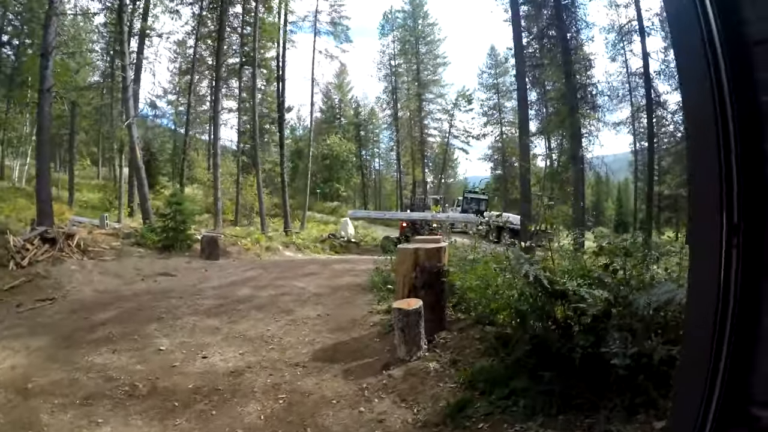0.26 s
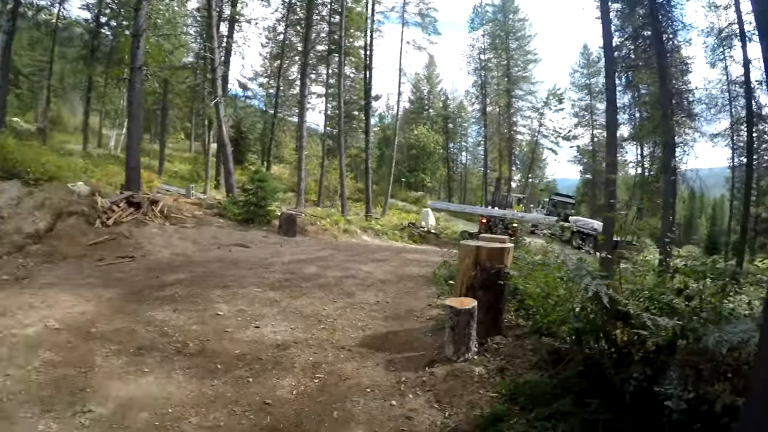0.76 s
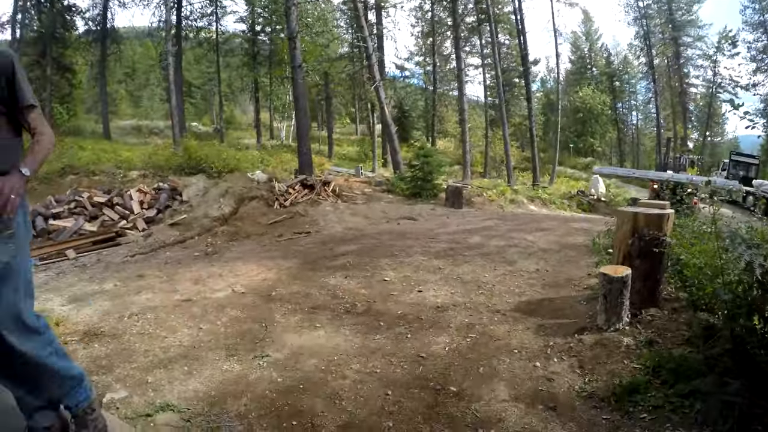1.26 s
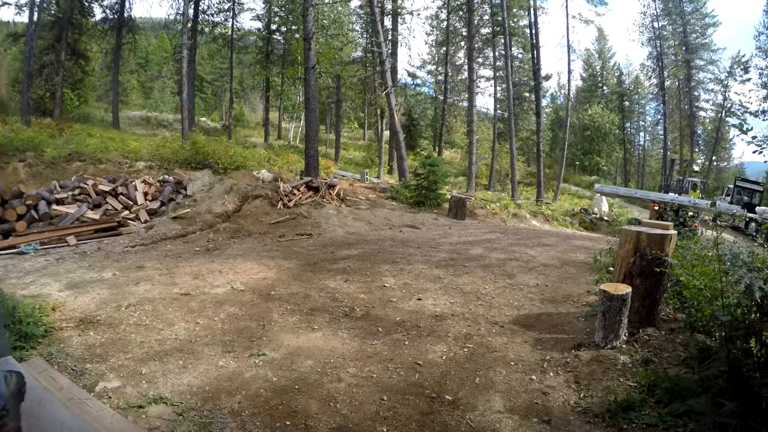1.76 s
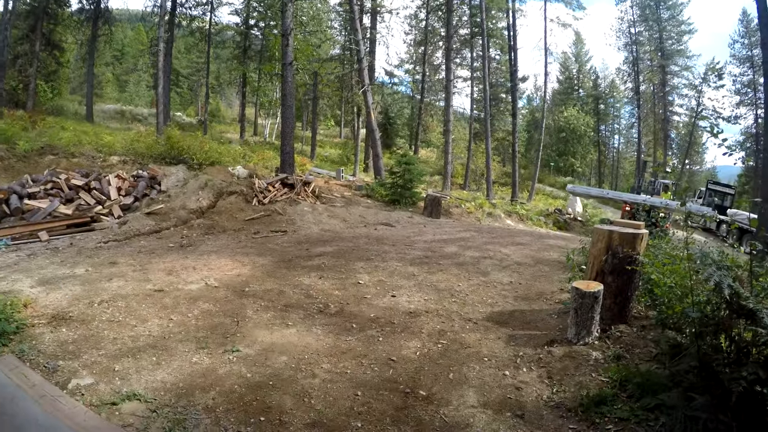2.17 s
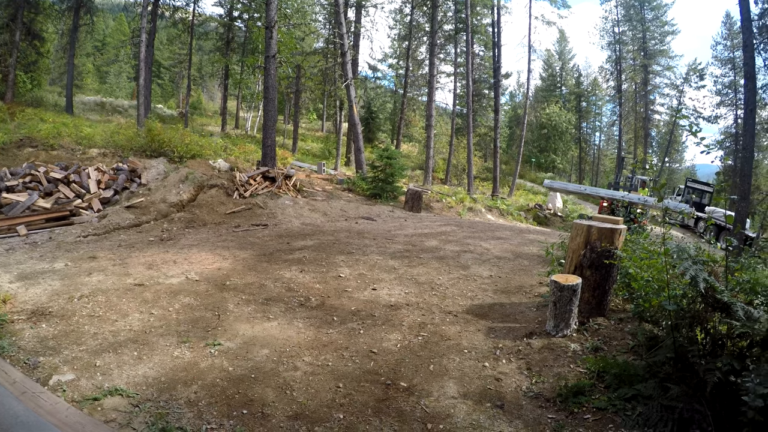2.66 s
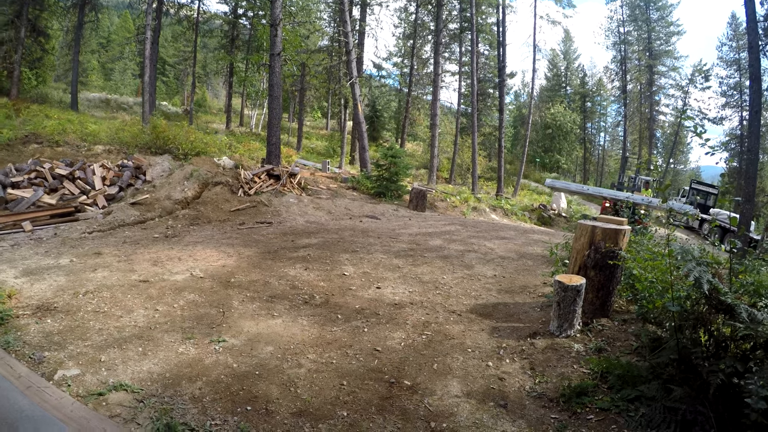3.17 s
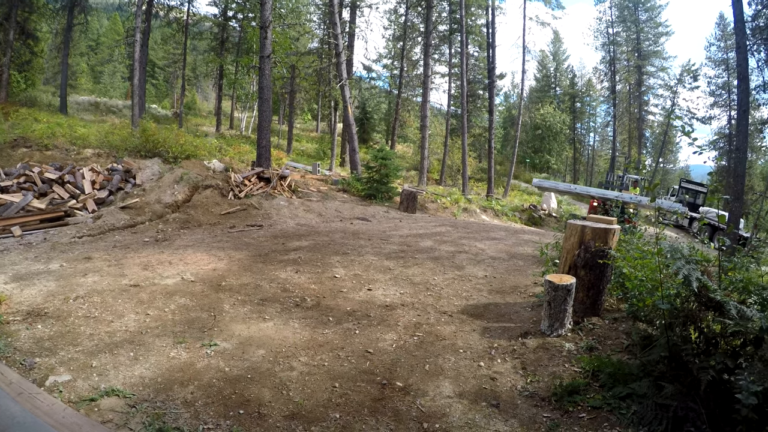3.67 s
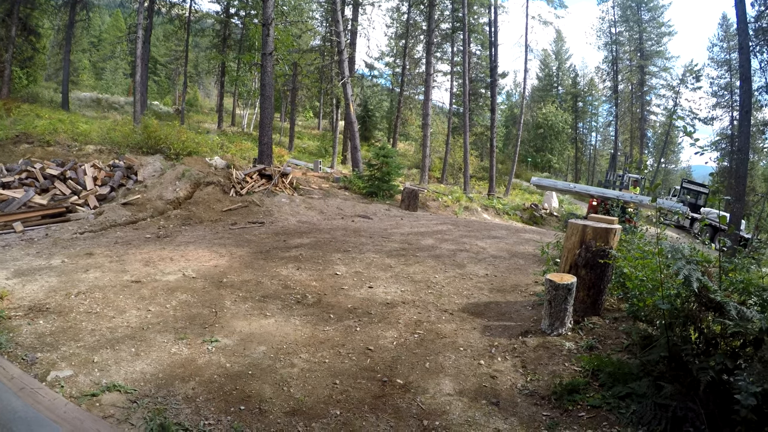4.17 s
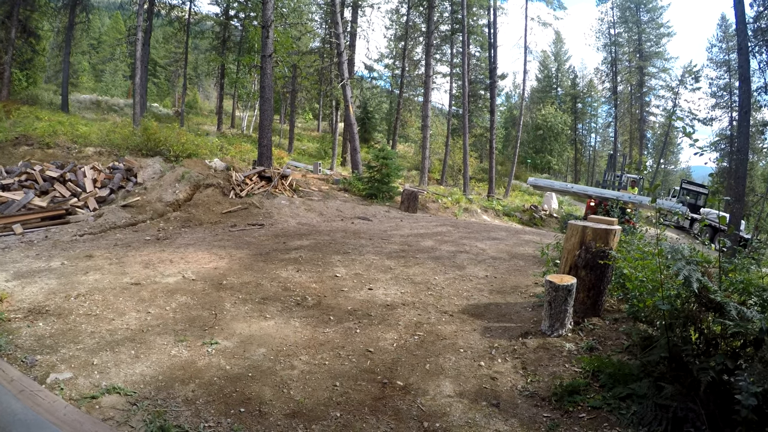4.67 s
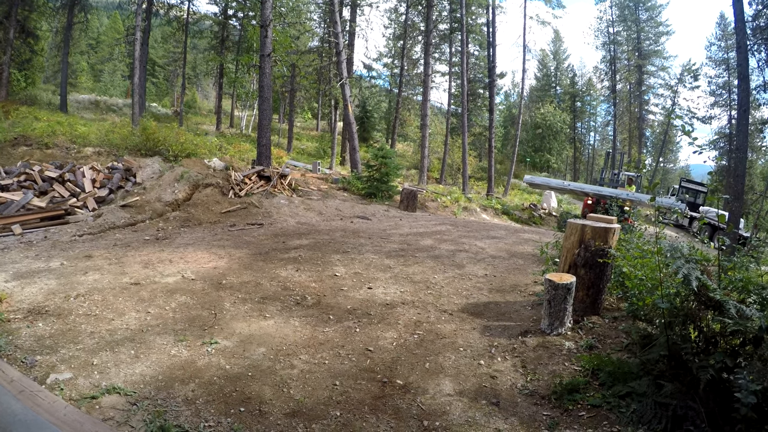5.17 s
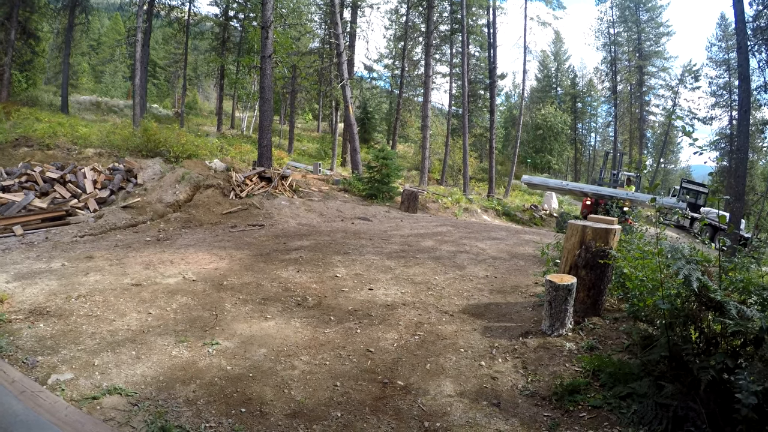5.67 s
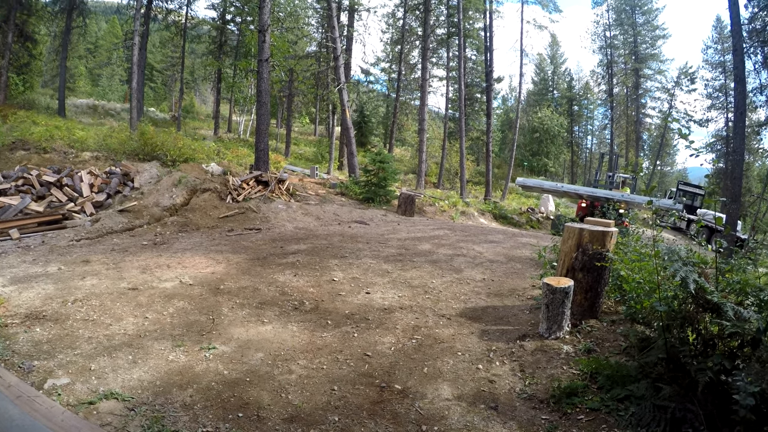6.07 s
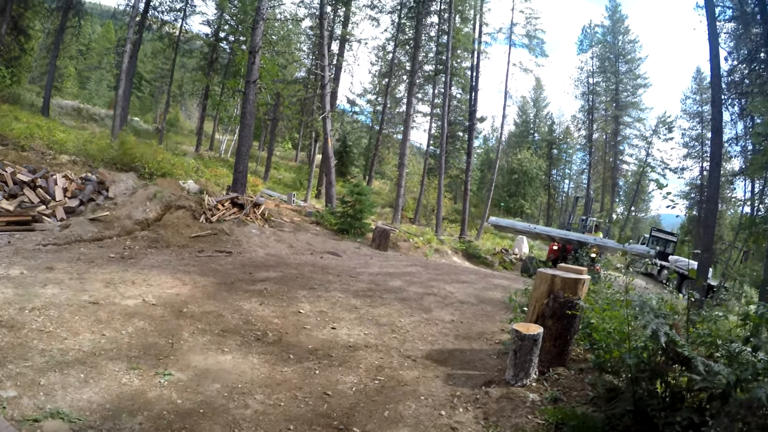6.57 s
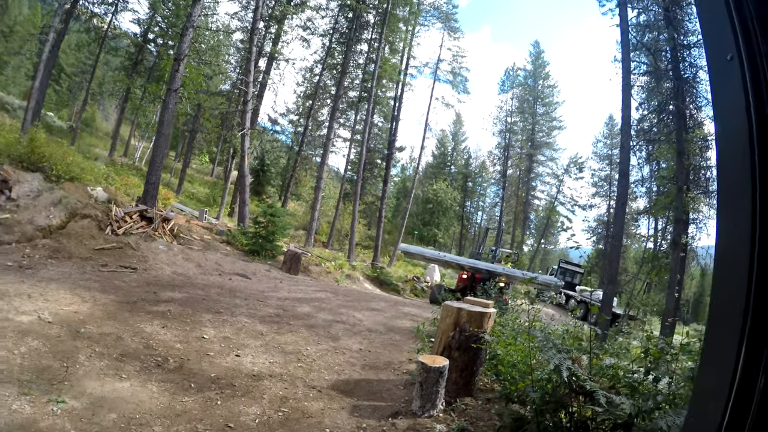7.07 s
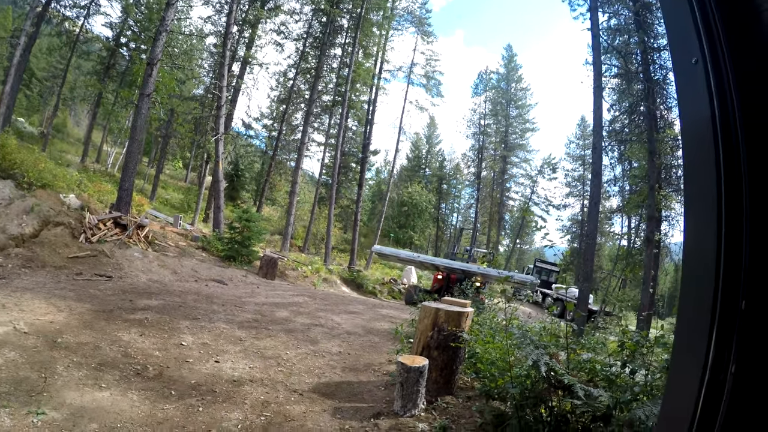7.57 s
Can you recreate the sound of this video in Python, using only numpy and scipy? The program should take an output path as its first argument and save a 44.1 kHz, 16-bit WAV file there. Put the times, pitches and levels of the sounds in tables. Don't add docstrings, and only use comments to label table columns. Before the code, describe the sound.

A small diesel forklift runs steadily some distance away in an open dirt yard, its throaty drone mixed with metallic clatter and fast injector ticking. Hydraulic pump whine swells and eases as levers are worked. A larger truck idles low underneath. A handheld camera picks up close scuffs and a dull knock in the first second, then more rubbing near the end as the engine grows brighter.

```python
import sys
import numpy as np
from scipy import signal
from scipy.fft import rfft, irfft, next_fast_len
from scipy.io import wavfile
from scipy.ndimage import map_coordinates

SR = 44100
rng = np.random.default_rng(int(sys.argv[2]) if len(sys.argv) > 2 else 0)


def inscribe(sig):
    pcm = np.round(np.clip(np.atleast_2d(sig).T, -1, 1) * 32767)
    wavfile.write(sys.argv[1], SR, pcm.astype(np.int16))


def attenuation_scalar(level_db):
    decades = np.asarray(level_db, float) / 20
    return 10 ** decades


N = 344862


def unit(x):
    return x / np.sqrt(np.mean(x ** 2) + 1e-20)


def along(points, hz, axis=1):
    table = np.asarray(points, float)
    return np.interp(np.log(hz + 1), np.log(table[:, 0] + 1), table[:, axis])


def curve(rows):
    s, value = np.transpose(rows)
    return np.interp(np.arange(N) / SR, s, value)


def held(start_s, length_s, ramp_s):
    t = np.arange(N) / SR
    inside_s = np.minimum(t - start_s, start_s + length_s - t)
    return np.clip(inside_s / ramp_s + .5, 0, 1)


def wobble(rate):
    at = np.arange(0, N + 64, 64)
    knots = rng.standard_normal(int(N * rate / SR) + 4)
    smooth = map_coordinates(knots, [at * rate / SR])
    return np.interp(np.arange(N), at, smooth)


def filtered(x, response):
    m = next_fast_len(N + SR // 4)
    return irfft(rfft(x, m) * response(np.fft.rfftfreq(m, 1 / SR)), m)[..., :N]


def coloured(spectrum):
    return unit(filtered(rng.standard_normal(N), lambda hz: attenuation_scalar(along(spectrum, hz))))


def resonance(hz, centre_hz, width_hz):
    return 1j * hz * width_hz / (centre_hz ** 2 - hz ** 2 + 1j * hz * width_hz)


def tone(cycles, db, drift, sway_db):
    turn = cycles + rng.random() + drift * wobble(3)
    return np.sqrt(2) * attenuation_scalar(db + sway_db * wobble(4)) * np.sin(2 * np.pi * turn)


def knocks(cycle, pattern, decay_s, echo_s, echo_db, scatter_db):
    blows = np.zeros(N)
    turns = np.arange(int(cycle[-1]))
    for share, db in pattern:
        at = np.searchsorted(cycle, turns + share)
        blows[at] = attenuation_scalar(db + scatter_db * rng.standard_normal(len(at)))
    t = np.arange(SR // 20) / SR
    shape = t / decay_s * np.exp(1 - t / decay_s)
    shape = shape + attenuation_scalar(echo_db) * np.interp(t - echo_s, t, shape, left=0)
    return signal.fftconvolve(blows, shape)[:N]


def doorway():
    return held(-1, 1 + 1.05, ramp_s=.26)


DOOR_DB = -5

# time in seconds, treble gain in dB.
FACING = [
    (0, 1),
    (.72, 1),
    (.88, -2.5),
    (1.6, -1),
    (4, -0.5),
    (6.3, -0.5),
    (6.5, 5),
    (7.25, 5.5),
    (7.55, 10.5),
    (7.82, 9.5),
]


def facing_db():
    return curve(FACING)


# time in seconds, firings per second.
FIRING_RATE = [(0, 37.12), (.42, 37.46), (1.02, 37.42), (1.2, 37.95), (1.72, 38.02), (1.87, 38.45),
               (2.15, 38.05), (2.35, 38.23), (3.0, 37.7), (3.45, 37.94), (3.85, 37.72), (4.3, 38.16),
               (6.4, 38.0), (6.8, 37.62), (6.95, 38.2), (7.45, 37.86), (7.7, 38.0), (7.82, 38.45)]


def crank():
    return np.cumsum(curve(FIRING_RATE)) / SR / 3


# multiple of the cycle, level in dB rms.
ENGINE_ORDERS = [(3, -28.5), (6, -22.5), (9, -28.5), (19, -40), (22, -35), (30, -41), (31, -36), (33, -39),
                 (37, -36), (39, -38.5), (41, -39.5), (44, -45.5), (45, -43), (48, -40), (54, -37),
                 (57, -55), (66, -61), (69, -60), (72, -43.5), (74, -52.5), (78, -64.5), (80, -59),
                 (90, -56.5), (92, -50), (93, -61.5), (96, -64), (115, -66), (180, -74)]


def engine_orders(cycle):
    out = np.zeros(N)
    for k, db in ENGINE_ORDERS:
        shade_db = DOOR_DB * doorway() * (k > 60)
        drift, sway_db = (.02, 1) if k < 10 else (.06, 1.8)
        out += tone(k * cycle, db + shade_db, drift, sway_db)
    return out


# multiple of the cycle, level in dB rms.
PUMP_TONES = [
    (24, -25.5),
    (36, -31),
    (105, -59),
    (108, -46),
]
# start in seconds, length in seconds, swell in dB.
LEVER_PULLS = [
    [(-.1, .45, 9), (.35, .8, 6), (1.85, .9, 2), (3.0, .6, 3), (3.65, .4, 6.5), (4.7, 1.5, 3),
     (6.6, 0.24, 5), (7.05, 0.26, 4)],
    [(.3, 0.67, 3.5), (1.17, 0.607, 7), (1.77, .75, 11), (4.0, 2.3, 7), (4.7, .6, 3), (6.84, .42, 13),
     (7.68, .3, 13)],
    [(3.0, 4.6, 11), (6.85, .75, 3)],
    [(-.1, .85, 3), (.95, .85, 6.5), (1.35, 0.41, 4), (2.3, .22, 4), (5.1, 1.45, 3.5), (6.85, 0.95, 6),
     (7.25, .44, 7.5)],
]


def pump_whine(cycle):
    out = np.zeros(N)
    for (k, rest_db), pulls in zip(PUMP_TONES, LEVER_PULLS):
        swell_db = sum(db * held(s, length, ramp_s=.05) for s, length, db in pulls)
        out += tone(k * cycle, rest_db + swell_db, drift=.04, sway_db=.82)
    return out


# frequency in Hz, level in dB.
CASING_SPECTRUM = [(400, -69.5), (680, 7), (760, 1.5), (950, -3), (1080, -7), (1180, -4), (1280, -9),
                   (1370, -4), (1500, -15.5), (1850, -16.5), (2000, -24), (2300, -34.5), (2700, -56),
                   (5000, -120)]
# share of the cycle, level in dB.
VALVE_BLOWS = [
    (.18, 3.5),
    (.48, 2),
    (.8, 4.5),
]


def casing_clatter(cycle):
    one_cycle = rng.standard_normal(2048)
    repeated = one_cycle[(cycle % 1 * len(one_cycle)).astype(int)]
    comb = filtered(repeated, lambda hz: attenuation_scalar(along(CASING_SPECTRUM, hz)))
    blows = knocks(cycle, VALVE_BLOWS, decay_s=.0014, echo_s=.0063, echo_db=-1.5, scatter_db=5.5)
    valves = (1.5 + .44 * blows) * coloured(CASING_SPECTRUM)
    casing_db = -35 + .32 * facing_db() + DOOR_DB * doorway()
    return attenuation_scalar(casing_db) * unit(.68 * unit(comb) + unit(valves))


# share of the cycle, level in dB.
INJECTIONS = [
    (.09, -7),
    (.43, -1.5),
    (.76, -3),
]


def injector_knock(cycle):
    def cover(hz):
        return resonance(hz, 3180, 380) * resonance(hz, 3330, 370)

    snap_s = .00004
    jets = .45 + knocks(cycle, INJECTIONS, decay_s=.0013, echo_s=.0078, echo_db=-4.5, scatter_db=2.5)
    spray = filtered(jets * rng.standard_normal(N), cover)
    needle = knocks(cycle, INJECTIONS, snap_s, echo_s=.0066, echo_db=-5, scatter_db=2)
    knock = unit(.39 * unit(filtered(needle, cover)) + unit(spray))
    clean = knocks(cycle, INJECTIONS, snap_s, echo_s=.004, echo_db=-3, scatter_db=2.5)
    ring = unit(filtered(clean, lambda hz: resonance(hz, 3250, 270) ** 2))
    knock = attenuation_scalar(DOOR_DB * doorway()) * knock + (.19 + .7 * doorway()) * ring
    return attenuation_scalar(-58 + facing_db()) * knock


def forklift():
    cycle = crank()
    return engine_orders(cycle) + pump_whine(cycle) + casing_clatter(cycle) + injector_knock(cycle)


# multiple of the engine cycle, level in dB rms.
TRUCK_ORDERS = [(2, -41.5), (4, -37), (6, -23), (8, -42.5), (12, -57.5), (18, -34.5), (20, -39), (22, -42)]
# frequency in Hz, level in dB rms.
FAN_TONES = [
    (42.5, -43),
    (107.5, -29),
    (260, -35),
]


def truck():
    cycle_hz = 7.5
    t = np.arange(N) / SR
    out = np.zeros(N)
    for k, db in TRUCK_ORDERS:
        out += tone(k * cycle_hz * t, db, drift=.036, sway_db=.3)
    for hz, db in FAN_TONES:
        boom_db = 8 * doorway() * (hz > 200)
        out += tone(hz * t, db + boom_db, drift=.046, sway_db=.5)
    return out


# frequency in Hz, level in dB.
RUMBLE_SPECTRUM = [(12, -40.5), (25, -30), (60, -18), (130, -9), (160, -11), (200, -0.5), (235, -9),
                   (290, -8.5), (390, -9), (440, -11.5), (620, -15), (700, -28.5), (800, -59), (1500, -120)]


def wall_rumble():
    return attenuation_scalar(-18.5 + .8 * wobble(5)) * coloured(RUMBLE_SPECTRUM)


def hiss_level_db():
    return -62 + .55 * facing_db() + 3 * doorway()


# frequency in Hz, level in dB.
HISS_SPECTRUM = [(2900, -31), (3700, 8), (4700, 8.5), (5200, 2.5), (7700, 3), (8200, -2), (10000, -5),
                 (13000, -22)]


def hiss():
    noise = coloured(HISS_SPECTRUM)
    swallowed = filtered(noise, lambda hz: abs(resonance(hz, 5200, 2500)))
    noise = noise - .5 * doorway() * swallowed
    return attenuation_scalar(hiss_level_db() + .56 * wobble(14)) * noise


# frequency in Hz, level in dB.
PRESENCE_SPECTRUM = [(600, -100), (1300, -30.5), (1700, 12.5), (2300, 0), (2800, 1.5), (3600, -0.5),
                     (4500, -53), (8000, -100)]


def presence():
    level_db = -59.5 + .95 * facing_db() + 5.5 * doorway()
    return attenuation_scalar(level_db) * coloured(PRESENCE_SPECTRUM)


# start in seconds, length in seconds, level in dB, centre in Hz.
RUBS = [(0, 0.024, -50.5, 4920), (.045, .04, -51.5, 2670), (.045, .04, -62.5, 5070), (.26, .07, -66, 7430),
        (0.252, 0.12, -52, 1700), (.1, .11, -54.5, 1600), (.5, .12, -54.5, 1600), (.51, .04, -68, 7500),
        (.834, 0.033, -59, 3620), (.834, .04, -70, 7580), (.828, .025, -40.5, 900),
        (1.227, .05, -64.5, 6000), (1.298, 0.1, -58.5, 2400), (1.748, 0.045, -69, 7000),
        (6.332, 0.076, -57, 2300), (6.45, 0.046, -48, 2520), (6.456, .1, -60.5, 6240),
        (6.497, .06, -52.5, 2786), (6.709, .073, -60, 4014), (6.598, 0.17, -58.5, 2400),
        (6.777, 0.16, -51.5, 2600), (6.8, .1, -61.5, 6470), (7.579, .03, -62.5, 9530),
        (7.345, 0.011, -64, 7000), (7.439, 0.14, -51.5, 2987), (7.537, .035, -58, 8050),
        (7.499, .12, -60.5, 5500), (7.771, 0.023, -56, 7500), (7.773, .025, -49.5, 3500)]


def scuffs():
    out = np.zeros((2, N + SR))
    for s, length_s, db, centre_hz in RUBS:
        n = int(length_s * SR * 1.6)
        u = np.arange(n) / (length_s * SR)
        grit = rng.standard_normal((3, n))
        grit = grit[:2] + .6 * grit[2]
        grit = grit * np.clip(u / .17, 0, 1) * np.exp(-1.3 * u ** 3)
        hz = np.fft.rfftfreq(n, 1 / SR)
        band = abs(resonance(hz, centre_hz, .63 * centre_hz)) ** 2 / (1 + (hz / 10500) ** 8)
        start = round(s * SR)
        out[:, start:start + n] += attenuation_scalar(db) * unit(irfft(rfft(grit) * band, n))
    return out[:, :N]


# time in seconds, peak in dB, ring in Hz, 60 dB decay in seconds.
HOUSING_TAPS = [(.833, -24, 1370, .05), (.833, -21, 750, .03), (.833, -29, 1750, .02),
                (.833, -36, 3600, .04), (.833, -39, 4740, .012), (.833, -36, 2400, .01),
                (6.398, -31, 4600, .01), (6.397, -29, 6400, .006), (6.397, -31, 7900, .005),
                (6.397, -37, 10500, .003), (6.398, -33, 2400, .009), (6.463, -40, 2650, .028),
                (1.152, -47, 4600, .02)]


def taps():
    out = np.zeros((2, N + SR))
    t = np.arange(SR // 10) / SR
    for s, db, hz, t60_s in HOUSING_TAPS:
        ring = attenuation_scalar(db - 60 * t / t60_s) * (1 - np.exp(-t / .0005)) * np.sin(2 * np.pi * hz * t)
        start = round(s * SR)
        out[:, start:start + len(t)] += ring * np.array([[.3], [1.2]])
    return out[:, :N]


# start in seconds, length in seconds, ramp in seconds, level in dB.
MAST_WORK = (6.5, 1.05, .15, -65)


def lift():
    start_s, length_s, ramp_s, db = MAST_WORK
    order = tone(180 * crank(), db, drift=.4, sway_db=3)
    whistle = filtered(rng.standard_normal(N), lambda hz: resonance(hz, 6030, 90))
    return held(start_s, length_s, ramp_s) * (order + attenuation_scalar(db - 5) * unit(whistle))


# frequency in Hz, gain in dB, phase in radians.
PORT_DIFFERENCE = [(86, -45.7, -1.93), (172, -34.5, -2.05), (258, -26.5, -2.21), (430, -17.5, -2.55),
                   (602, -11.3, -2.91), (861, -3.9, -3.74), (1119, -2.8, -4.24), (1464, -3.3, -4.48),
                   (1808, -7.4, -5.09), (2067, -11.3, -5.26), (3100, -22, -6.3), (5400, 0, -6.3),
                   (7700, -6, -8), (10000, -14, -9.3)]
# frequency in Hz, level in dB.
SCATTER_SPECTRUM = [(25, 5), (90, -4), (430, 3.5), (600, 9.5), (860, -5), (1460, -5), (2070, -16),
                    (2600, -33), (5000, -110)]
# frequency in Hz, level in dB.
LEAVES_SPECTRUM = [(1500, -79), (2500, 7), (3100, 2), (3600, -1), (4700, -3), (6000, -3.5), (7700, 0.5),
                   (8600, -7), (9900, -10), (11200, -20.5), (12500, -25.5), (14000, -43.5)]


def port_difference(both):
    def housing(hz):
        return attenuation_scalar(along(PORT_DIFFERENCE, hz)) * np.exp(1j * along(PORT_DIFFERENCE, hz, axis=2))

    yard = attenuation_scalar(-43) * coloured(SCATTER_SPECTRUM)
    leaves = attenuation_scalar(hiss_level_db() + 2) * coloured(LEAVES_SPECTRUM)
    return filtered(both, housing) + yard + leaves


def scene():
    both = forklift() + truck() + wall_rumble() + hiss() + presence() + lift()
    apart = port_difference(both)
    return np.array([both + apart, both - apart]) + scuffs() + taps()


def top_cut(x):
    return signal.sosfilt(signal.butter(12, 13480, fs=SR, output="sos"), x)


def record(dry):
    top = .76
    mix = dry / (1 + (dry / top) ** 4) ** (1 / 4)
    mix = mix * np.clip((N - np.arange(N)) / 64, 0, 1)
    return top_cut(mix)


dry = scene()
out = record(dry)
inscribe(out)
```